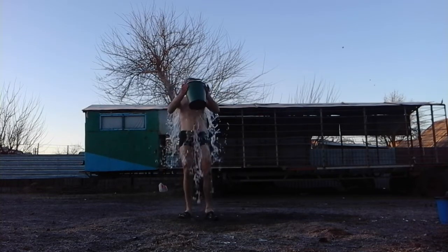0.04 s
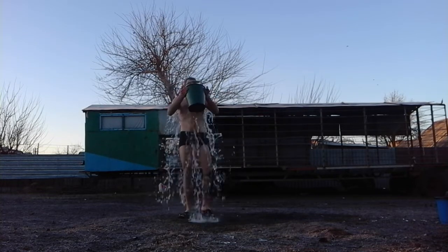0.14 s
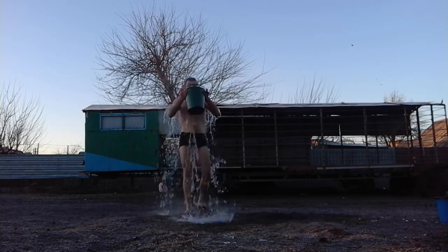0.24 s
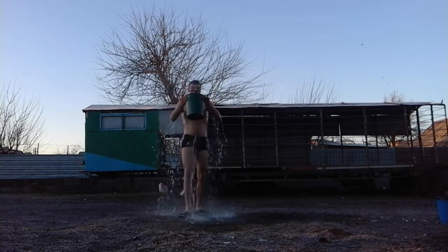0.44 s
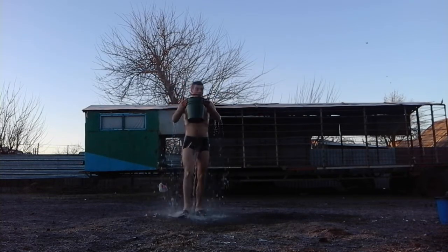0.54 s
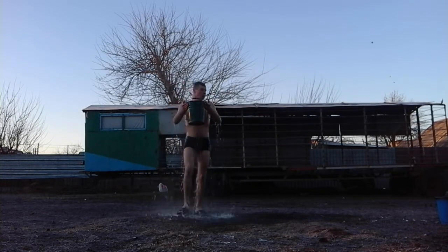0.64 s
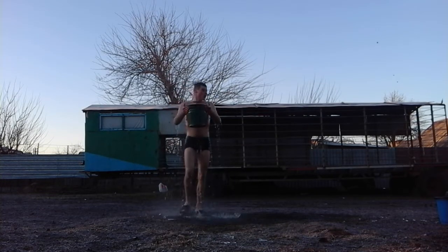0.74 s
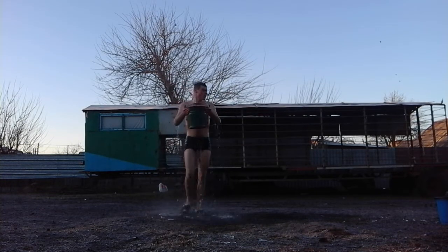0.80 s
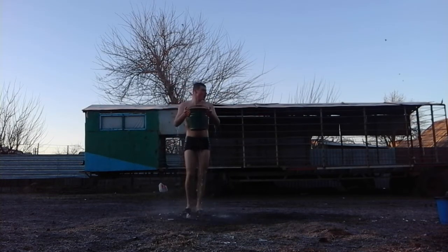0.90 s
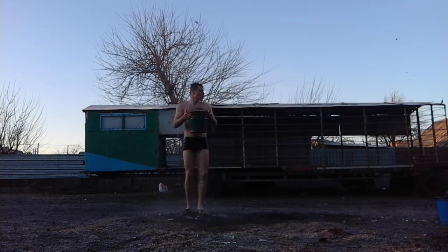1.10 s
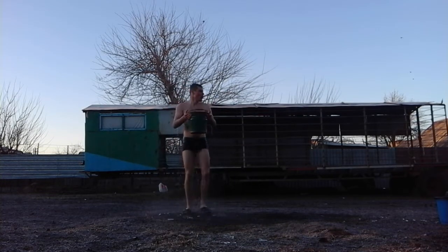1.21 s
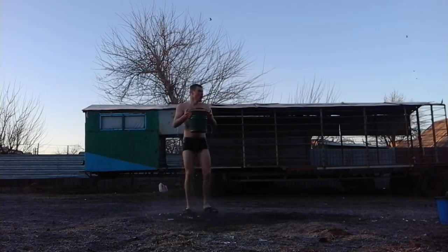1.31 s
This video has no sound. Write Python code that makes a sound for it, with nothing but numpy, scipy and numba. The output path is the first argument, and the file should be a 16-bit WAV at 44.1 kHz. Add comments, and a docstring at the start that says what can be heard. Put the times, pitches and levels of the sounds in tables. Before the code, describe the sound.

A bucket of water dumped over a person: a brief faint trickle, then sharp slaps and dense splattering on the ground, fading to drips in a quiet yard, heard from some metres by a small, thin-sounding microphone.

```python
"""A bucket of water is tipped over a person in a quiet yard, some metres from a small mono microphone.
First drops trickle: short rings rising in pitch, over faint filtered-noise air.
Then the sheet slaps the ground: cracks, low thuds, dense random plops, noise spray and mist, a runoff rumble.
Last it thins to drips and a few longer bubble rings. A surface nearby returns each water hit a few ms later;
the microphone favours 3-5 kHz and its two channels hiss faintly throughout."""
import sys
import numpy as np
from scipy import signal
from scipy.fft import rfft, irfft
from scipy.io import wavfile
from scipy.ndimage import uniform_filter1d
from numba import njit

SR = 44100
rng = np.random.default_rng(int(sys.argv[2]) if len(sys.argv) > 2 else 0)


def magnitude_from_level(level_db):
    """Linear magnitude for a level in decibels (20 dB per decade)."""
    exponent = np.asarray(level_db, float) / 20
    return 10 ** exponent


def wrap_up_sound(samples):
    """Save the sound to the file named by the first command line argument, as 16-bit audio."""
    columns = np.atleast_2d(samples).T
    # keep every value between -1 and 1, then stretch to whole-number steps
    tamed = np.clip(columns, -1, 1)
    steps = np.round(tamed * 32767).astype(np.int16)
    wavfile.write(sys.argv[1], SR, steps)


N = 59535
TIME_S = np.arange(N) / SR
GLIDE_PER_CYCLE = 0.048  # fractional pitch rise
RISE_SHARE = 0.42  # swell time / ring decay time


def level(x, rms_db):
    """Scales x to an RMS level."""
    return x * magnitude_from_level(rms_db) / np.sqrt(np.mean(x ** 2))


def walk(rate_hz):
    """Random levels held 1 / rate_hz and slewed twice; spread near 1."""
    k = int(SR / rate_hz)
    steps = np.repeat(rng.standard_normal(N // k + 1), k)
    return 1.3 * uniform_filter1d(uniform_filter1d(steps, k), k)[:N]


def butter(x, order, hz, kind="low"):
    """Butterworth filter."""
    return signal.sosfilt(signal.butter(order, hz, kind, fs=SR, output="sos"), x)


def air():
    """Distant outdoor murk: noise, power falling as 1 / f^tilt, swelling a little."""
    base_db, tilt, swell_db = -69, 1, 2
    f_hz = np.maximum(np.fft.rfftfreq(N, 1 / SR), 25)
    murk = irfft(rfft(rng.standard_normal(N)) * f_hz ** (-tilt / 2), N)
    return magnitude_from_level(swell_db * walk(5.7)) * level(murk, base_db)


# low outdoor rumble, thicker while water runs over the ground: t/s, level/dB
RUNOFF_LEVEL = [(0, -60.5), (.2, -65), (.5, -50), (.88, -48.5), (1.02, -52), (1.35, -59)]


def runoff():
    """Low-passed noise on a level curve, wavering."""
    cutoff_hz, waver_db = 190, 1.2
    t_s, level_db = np.array(RUNOFF_LEVEL).T
    low = butter(rng.standard_normal(N), 2, cutoff_hz)
    return level(low, 0) * magnitude_from_level(np.interp(TIME_S, t_s, level_db) + waver_db * walk(24.9))


def yard(x):
    """Reflections: one early dull echo and a short scattered tail of decaying noise."""
    echo_s, echo_db, echo_top_hz = .0046, -9.5, 5400
    tail_db, t60_s = -15, .2
    lag = int(round(echo_s * SR))
    echo = butter(np.pad(x, (lag, 0))[:N], 1, echo_top_hz)
    t_s = np.arange(SR // 4) / SR
    tail = rng.standard_normal(len(t_s)) * magnitude_from_level(-60 * t_s / t60_s) * (t_s > echo_s)
    tail = tail / np.sqrt(np.sum(tail ** 2))
    return x + magnitude_from_level(echo_db) * echo + magnitude_from_level(tail_db) * signal.fftconvolve(x, tail)[:N]


@njit
def plops(start_s, hz, cycles, size, glide, rise):
    """Each plop is a ring that swells briefly, then dies by 1/e in its number of cycles while its pitch rises."""
    out = np.zeros(N)
    for k in range(len(start_s)):
        i, phase, f, a = int(start_s[k] * SR), 0., hz[k] / SR, size[k]
        while a > .003 * size[k] and i < N and f < .45:
            swell = 1 - np.exp(-(phase / (rise * cycles[k])) ** 2)
            out[i] += a * swell * np.sin(2 * np.pi * phase)
            phase += f
            a *= np.exp(-f / cycles[k])
            f *= 1 + glide * f
            i += 1
    return out


# trapped air that rings longer: t/s, level/dB, f/Hz, decay/cycles
BUBBLE_RINGS = [(.028, -54, 1570, 17), (.142, -57, 1700, 14), (.196, -55, 1860, 11), (0.209, -51, 1730, 14),
                (.597, -34, 880, 5.9), (.606, -33, 980, 3.3), (1.0825, -53, 3900, 18),
                (1.177, -55, 3970, 30), (1.209, -54, 3600, 17), (1.222, -59, 3330, 17)]


def bubbles():
    """Trapped air: longer, nearly steady rings."""
    t_s, level_db, hz, cycles = np.array(BUBBLE_RINGS, float).T
    return plops(t_s, hz, cycles, magnitude_from_level(level_db), 0.0025, 0.071)


# heavy sheets of water thumping the ground: t/s, level/dB, f/Hz
SHEET_THUDS = [(0.227, -31, 306), (.343, -32.5, 210), (.472, -21.5, 218), (.632, -21, 246),
               (0.849, -29.5, 79)]


def thuds():
    """Heavy sheets: low rings dying by 1/e in under half a cycle."""
    t_s, level_db, hz = np.array(SHEET_THUDS, float).T
    return plops(t_s, hz, np.full(len(t_s), 0.48), magnitude_from_level(level_db), GLIDE_PER_CYCLE, 0.63)


# single slaps and drips: t/s, level/dB, f/Hz, spatter re slap/dB
SLAP_HITS = [(0.0029, -39.5, 2440, -11.5), (0.0328, -39.5, 1670, -15.5), (0.146, -43, 4430, -15),
             (0.2075, -45, 4960, -17), (0.218, -38, 4170, -8), (0.2276, -31, 3360, -25),
             (0.2274, -10.5, 797, -21.5), (0.2374, -19, 1520, -9.5), (0.2434, -26.5, 4200, -13),
             (0.253, -25.5, 1670, -12), (0.2746, -25, 5080, -6), (0.2916, -30, 4270, -23),
             (0.318, -18, 820, -26), (0.327, -19.5, 905, -19), (0.335, -19.5, 1010, -7.5),
             (0.3353, -20.5, 4500, -19), (0.361, -21, 900, -10.5), (0.385, -18.5, 4200, -12.5),
             (0.4099, -21, 910, -10), (0.4607, -21, 920, -17), (0.4618, -26.5, 2900, -12),
             (0.4654, -25, 2600, -15), (0.4712, -15, 1860, -22), (0.4726, -22.5, 4060, -13),
             (0.4724, -15.5, 635, -20), (0.4768, -19, 1320, -16), (0.4811, -17.5, 2360, -19),
             (0.512, -19, 2940, -21), (0.5226, -22, 4130, -8), (0.5623, -13, 5530, -18.5),
             (0.5621, -15.5, 2600, -8.5), (0.578, -26, 3950, -10), (0.6138, -27, 4150, -14),
             (0.622, -25, 4600, -12), (0.6307, -19.5, 4200, -10), (0.6345, -26, 4600, -16),
             (0.662, -24, 3670, -9.5), (0.6977, -27, 3760, -17), (0.706, -24.5, 3000, -8),
             (0.728, -20, 2640, -15), (0.7677, -19.5, 3780, -17), (0.7711, -14.5, 2160, -17),
             (0.7765, -23, 1480, -14), (0.78, -23, 4500, -14), (0.783, -20.5, 1510, -19),
             (0.788, -24, 4040, -15), (0.834, -27, 3750, -12), (0.88, -24.5, 4300, -9),
             (0.9014, -29.5, 3500, -6.5), (0.962, -33, 4480, -22), (0.9918, -32.5, 567, -19),
             (1.059, -39, 4080, -7), (1.0733, -37.5, 3900, -11), (1.1107, -39, 3900, -23),
             (1.118, -39.5, 2520, -22), (1.1276, -41, 3500, -15), (1.1456, -42, 4040, -7),
             (1.153, -47, 4200, -10), (1.1685, -37.5, 4430, -9), (1.189, -43, 4100, -12),
             (1.2197, -41, 2520, -14), (1.231, -48, 4560, -13), (1.239, -50, 4260, -21),
             (1.2542, -54, 4170, -20), (1.3056, -37, 4000, -13)]


def slaps():
    """A crack, a short ring at the slap's pitch and thrown droplets of kindred size landing just after."""
    crack_db, ring_cycles_at_3900_hz = -6, 2.0
    droplets, spatter_s, rough_db = 20, .007, 3.0
    scatter_octaves, spatter_cycles_at_2800_hz = 0.43, 1.14
    cycles_power = 0.87  # low pitches ring fewer cycles

    t_s, level_db, hz, spatter_db = np.array(SLAP_HITS, float).T[:, :, None]
    crack = np.zeros(N)
    crack[(t_s * SR).astype(int)] = magnitude_from_level(level_db + crack_db)
    ring_cycles = ring_cycles_at_3900_hz * (hz.ravel() / 3900) ** cycles_power
    ring = plops(t_s.ravel(), hz.ravel(), ring_cycles, magnitude_from_level(level_db).ravel(), GLIDE_PER_CYCLE, RISE_SHARE)

    shape = len(t_s), droplets
    late_s = -spatter_s * np.log(1 - rng.random(shape))
    rough = magnitude_from_level(level_db + spatter_db + rough_db * rng.standard_normal(shape))
    size = rough * np.exp(-late_s / spatter_s / 2)
    drop_hz = np.clip(hz * 2 ** (scatter_octaves * rng.standard_normal(shape)), 200, 15000).ravel()
    drop_cycles = spatter_cycles_at_2800_hz * (drop_hz / 2800) ** cycles_power
    spatter = plops((t_s + late_s).ravel(), drop_hz, drop_cycles, size.ravel(), GLIDE_PER_CYCLE, RISE_SHARE)
    return ring + crack + spatter


def patter(per_s, low_hz, high_hz, cycle_scale, spread_db, bend, share=np.ones(N)):
    """Random plops at 0 dB RMS, most small, a few large; bend > 1 favours low pitches; only a share falls."""
    biggest_db = 7  # limit above the smallest
    when, pitch, bulk, decay = rng.random((int(4000 * N / SR), 4)).T  # 4000 candidates per s
    rank = np.linspace(0, 1, len(when))
    on = np.clip(per_s * share[(when * N).astype(int)] / 40 - 100 * rank, 0, 1)
    hz = low_hz + (high_hz - low_hz) * pitch ** bend
    size = on * magnitude_from_level(biggest_db * np.tanh(-spread_db * np.log(1 - bulk) / biggest_db))
    cycles = cycle_scale * (0.47 + decay) / 2
    rings = plops(when * N / SR, hz, cycles, size, GLIDE_PER_CYCLE, RISE_SHARE)
    return level(rings / np.sqrt(share), 0)  # sqrt offsets the thinning


# falling water: t/s, flow level/dB, big low lumps re flow/dB, fine mist re flow/dB
WATER_FLOW = [(0, -67.5, -12, -10), (.05, -74.5, 5.5, 1), (.13, -74.5, -2, 2.5), (.15, -70.5, -7.5, 5),
              (.19, -74, 3.5, -7), (0.224, -65, -3.5, 8), (0.227, -49.5, 0.5, 0), (0.266, -58.5, 4, 6),
              (0.281, -48, -4.5, 4), (.31, -49.5, -0.5, -2), (0.332, -43, -4, -0.5), (.4, -45.5, -7, -1),
              (0.473, -43, -1.5, -4), (0.531, -41.5, -10.5, -2.5), (0.598, -45.5, -6, -2.5),
              (.63, -39.5, -10, -5.5), (.68, -48.5, -7, 2.5), (.735, -44, -11, 2), (.76, -46, -11, 3.5),
              (.82, -48, -8.5, 0.5), (.9, -52.5, -3.5, 3.5), (0.969, -61, -4, 7.5), (1.049, -68, -2, 7.5),
              (1.14, -70.5, 1, 11), (1.18, -67.5, -0.5, 8), (1.24, -69.5, -2, 8.5), (1.27, -84, 11, 13.5),
              (1.35, -77, 4.5, 9.5)]


def pour():
    """Fine drops, heavy lumps, spray and mist, all riding on the flow."""
    full_flow_db, thinnest = -58, .35  # below full flow drops get fewer and spray fades
    drop_db, lump_db, spray_db, mist_db, tick_db = 3.5, 8.5, 3, 5.5, -1.5
    spray_flicker_db, patchy_db, mist_patchy_db = 1.5, 1.1, 1.27
    mist_low_cut_hz = 6320

    table = np.array(WATER_FLOW)
    flow_db, lump_share_db, mist_share_db = [np.interp(TIME_S, table[:, 0], col) for col in table[:, 1:].T]
    share = np.clip(magnitude_from_level(flow_db - full_flow_db), thinnest, 1)

    drops = magnitude_from_level(drop_db) * patter(3900, 1700, 13350, 2.8, 1.8, 1.026, share)
    lumps = magnitude_from_level(lump_db + lump_share_db) * patter(624, 256, 1700, 1.33, 1, 1.243)
    spray = magnitude_from_level(spray_db + spray_flicker_db * walk(150)) * np.sqrt(share) * rng.standard_normal(N)
    body = magnitude_from_level(patchy_db * walk(40)) * (drops + lumps + spray)

    ticks = patter(794, 5300, 13800, 1.06, 7.7, 1.22)  # fine droplets cracking within the mist
    mist = butter(rng.standard_normal(N) + magnitude_from_level(tick_db) * ticks, 2, mist_low_cut_hz, "high")
    mist = mist * magnitude_from_level(mist_patchy_db * walk(39.33))
    return magnitude_from_level(flow_db) * (body + magnitude_from_level(mist_db + mist_share_db) * mist)


def scene():
    """Water with yard reflections, over runoff and air; same in both channels."""
    mono = yard(pour() + slaps() + thuds() + bubbles()) + runoff() + air()
    return np.array([mono, mono])


# microphone response: f/Hz, gain/dB
MIC_RESPONSE = [(20, -46), (70, -28), (300, -20.5), (1000, -10.5), (2000, -9.5), (3150, 0.5), (4540, -0.5),
                (6210, -12), (9000, -20), (15500, -24)]


def microphone(x):
    """Causal minimum-phase colour, its filter built through the folded cepstrum."""
    hz, gain_db = np.array(MIC_RESPONSE).T
    grid_hz = np.linspace(1, SR / 2, 2049)
    log_gain = np.interp(np.log(grid_hz), np.log(hz), gain_db) * np.log(10) / 20
    cepstrum = irfft(log_gain)
    cepstrum[1:2048] *= 2
    cepstrum[2049:] = 0
    taps = irfft(np.exp(rfft(cepstrum)))[:2048]
    return signal.fftconvolve(x, taps[None])[:, :N]


def channel_noise(x):
    """Separate noise per channel: a steady faint hiss and low rumble, plus a part that follows loudness."""
    steady_db, following_db, rumble_re_hiss_db = -82.5, -35, -10
    hiss, white = rng.standard_normal((2, 2, N))
    rumble = butter(white, 1, [50, 387], "band")
    loudness = uniform_filter1d(np.abs(x[0]), size=4000)
    return (magnitude_from_level(steady_db) + magnitude_from_level(following_db) * loudness) * (hiss + level(rumble, rumble_re_hiss_db))


def low_pass(x):
    """Removes everything above the highest recorded frequency."""
    return signal.sosfilt(signal.butter(12, 15780, fs=SR, output="sos"), x)


def record(dry):
    """Microphone colour, channel noise, steep top cut, small DC offset."""
    x = microphone(dry)
    x = x + channel_noise(x)
    x = signal.sosfilt(signal.ellip(8, .2, 60, 15700, fs=SR, output="sos"), x)
    mix = x - .0003  # DC offset
    return low_pass(mix)


dry = scene()
out = record(dry)
wrap_up_sound(out)
```